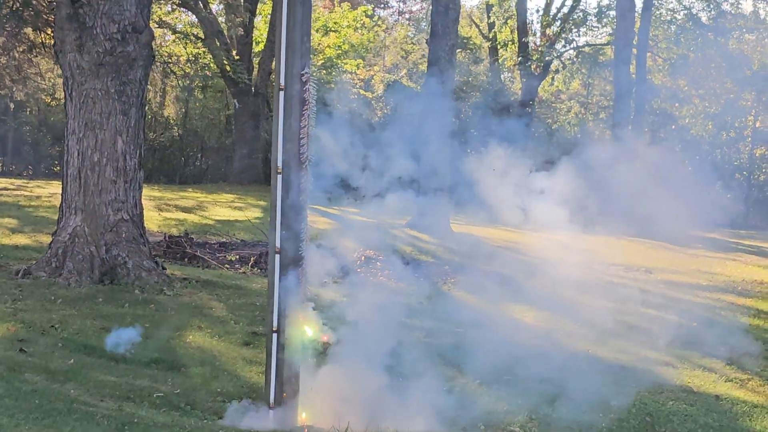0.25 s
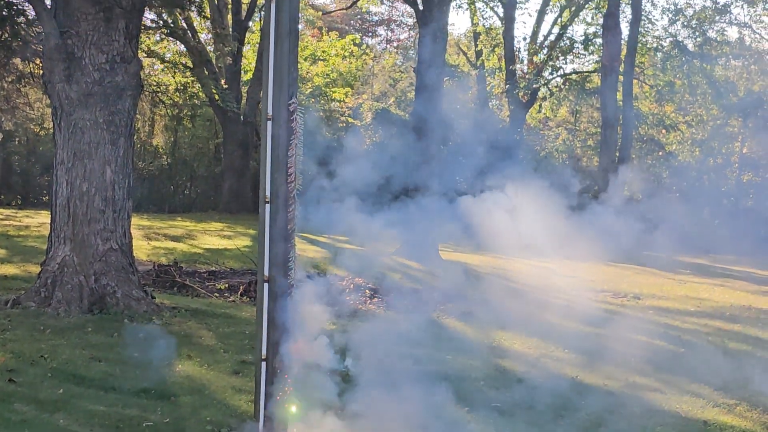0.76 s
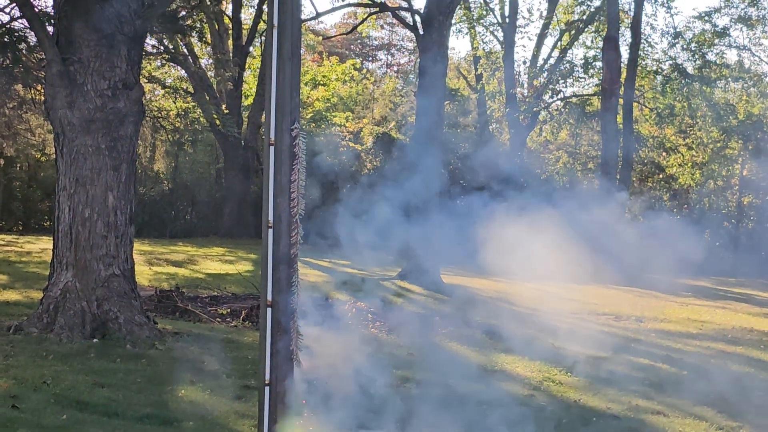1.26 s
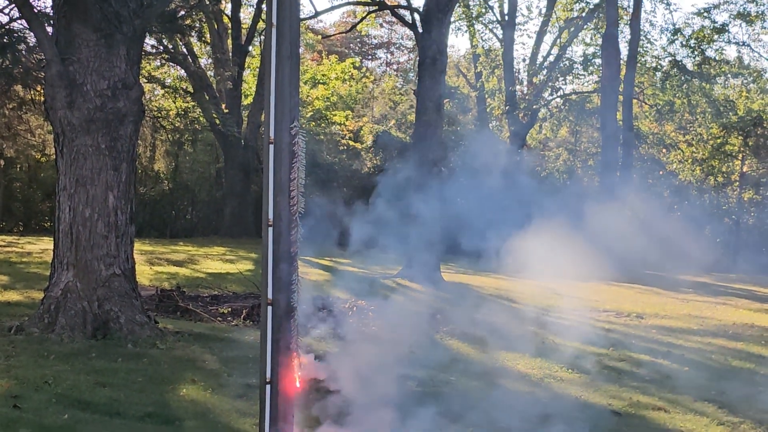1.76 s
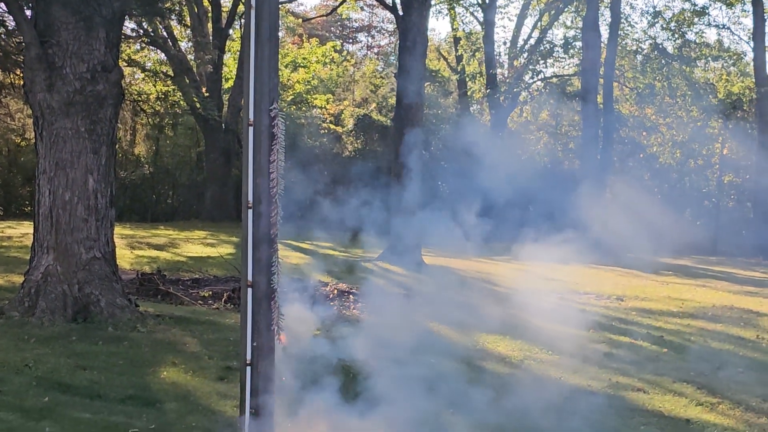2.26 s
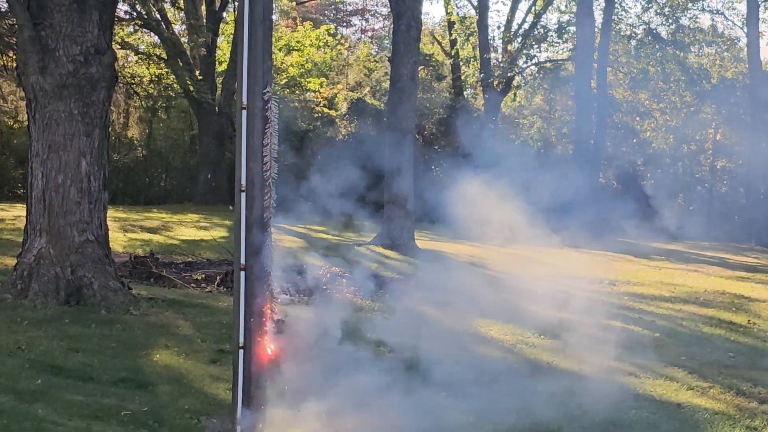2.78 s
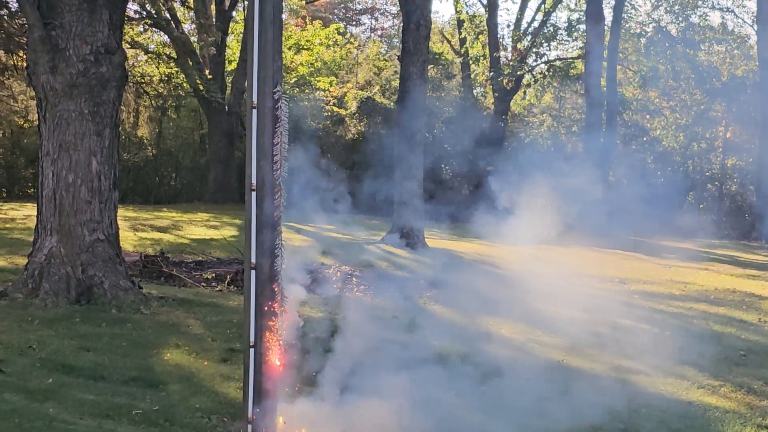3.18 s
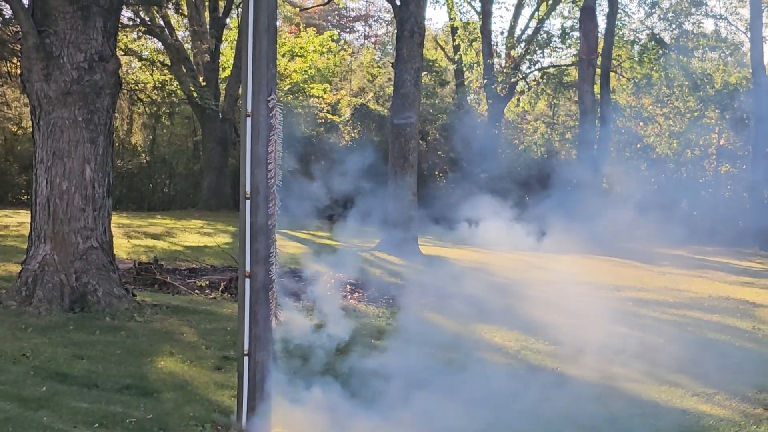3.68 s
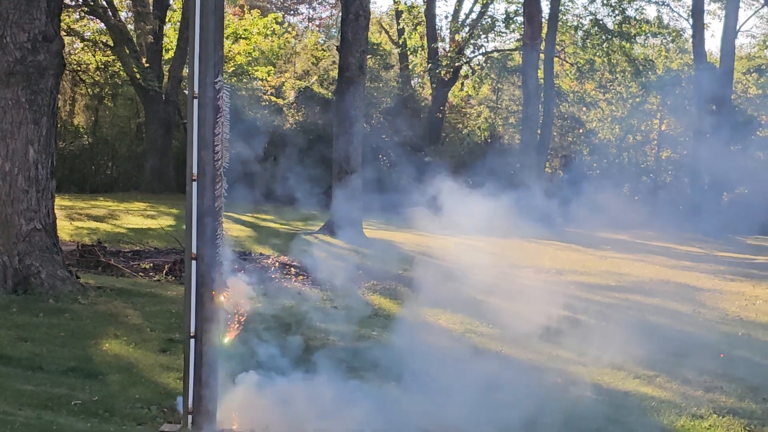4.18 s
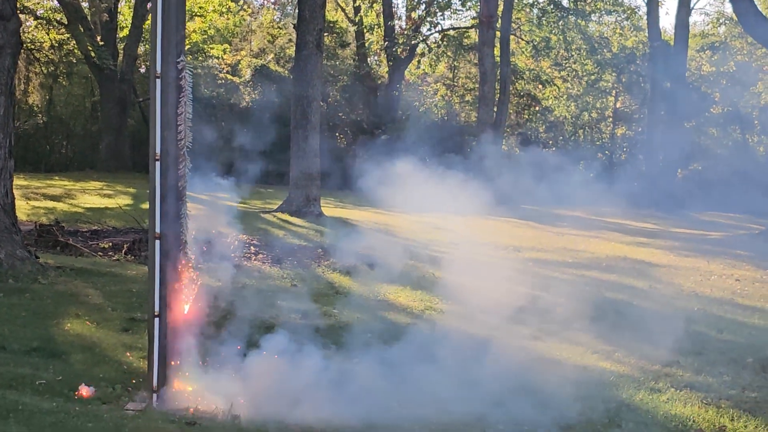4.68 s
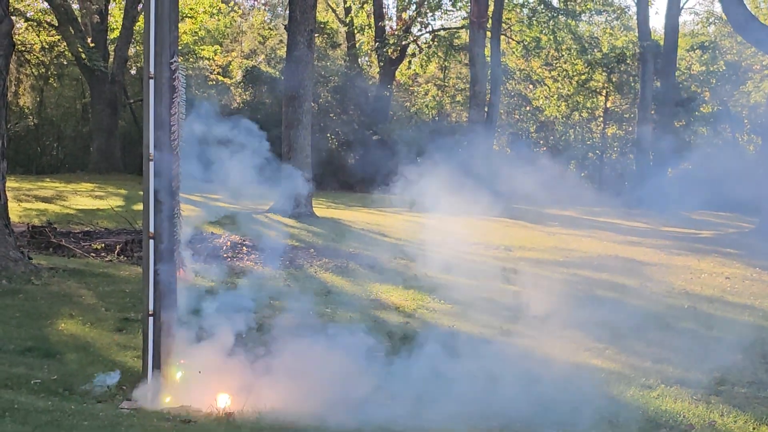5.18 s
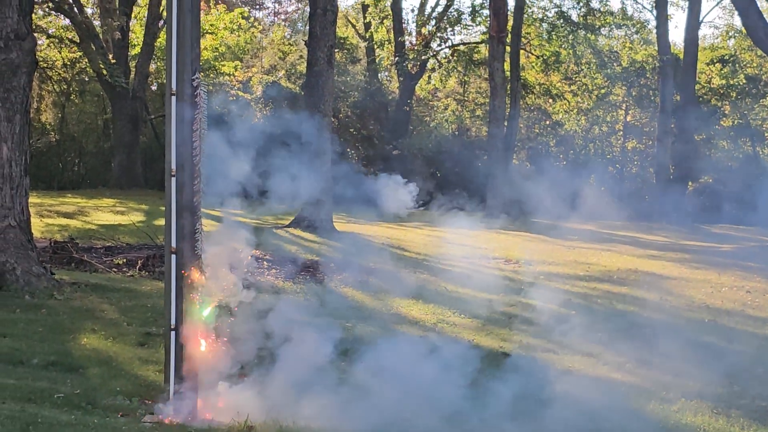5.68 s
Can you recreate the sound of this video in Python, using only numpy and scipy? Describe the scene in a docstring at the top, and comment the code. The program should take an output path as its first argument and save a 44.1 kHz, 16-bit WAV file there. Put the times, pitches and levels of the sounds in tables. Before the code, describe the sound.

A string of firecrackers goes off in sharp, uneven cracks in a tree-lined park, each one thrown back as a bright, splashing echo.

```python
"""A string of firecrackers hanging on a pole goes off in uneven bursts in a park.
Each cracker is a 3 ms crack, a saturated shock front and noise burst, with a knock of damped gas modes.
Trunks and foliage throw it back as a bright wash of decaying noise bands with a few distinct echoes.
Blasts leave a low thump in the microphone, and puffs of air swing it at low pitch.
Leaves rustle faintly as coloured noise and a far engine drones as a wavering sine."""
import sys
import numpy as np
from scipy import signal
from scipy.fft import rfft, irfft
from scipy.io import wavfile

SR = 44100
rng = np.random.default_rng(int(sys.argv[2]) if len(sys.argv) > 2 else 0)


def dump_mix(stems):
    """Bounce the given channels to the path in sys.argv[1] as a 16-bit WAV at rate SR."""
    frames = np.atleast_2d(stems).T  # one column per channel
    limited = np.clip(frames, -1, 1)  # hard clip at full scale
    pcm = np.round(limited * 32767).astype(np.int16)
    wavfile.write(sys.argv[1], SR, pcm)


N = 261954
TIME = np.arange(N) / SR


def from_db(db):
    """Decibel law: 20 dB is a tenfold amplitude."""
    return 10 ** (np.asarray(db) / 20)


def rms_one(x):
    """Power normalisation: scales a sound to rms 1."""
    return x / np.sqrt(np.mean(x ** 2) + 1e-20)


def over_3_ms(x):
    """Energy normalisation: gives a stereo pulse the energy of 3 ms at rms 1."""
    return x / np.sqrt(np.sum(x ** 2) / (2 * .003 * SR))


def at_hz(points, hz):
    """Logarithmic pitch: interpolates a table of (Hz, value) along log frequency."""
    hzs, values = np.transpose(points)
    return np.interp(np.log(np.maximum(hz, 1)), np.log(hzs), values)


def add(out, s, sound):
    """Superposition: mixes a sound in at time s, cut to the length of the scene."""
    at = int(round(s * SR))
    first, last = max(at, 0), min(at + sound.shape[-1], N)
    out[:, first:last] += sound[..., first - at:last - at]


def butter(x, hz, kind, order=2):
    """Maximally flat filtering: a causal Butterworth filter."""
    return signal.sosfilt(signal.butter(order, hz, kind, fs=SR, output="sos"), x)


def peaked(x, hz, peak_db, q):
    """Resonance: lifts one narrow region of a sound by peak_db."""
    b, a = signal.iirpeak(hz, q, fs=SR)
    return x + (from_db(peak_db) - 1) * signal.lfilter(b, a, x)


def coloured(x, spectrum):
    """Minimum-phase filtering by folded cepstrum, so that nothing sounds early."""
    size = 2 * x.shape[-1]
    bin_hz = np.arange(size // 2 + 1) * SR / size
    cepstrum = irfft(np.log(from_db(at_hz(spectrum, bin_hz))))
    cepstrum[1:size // 2] *= 2
    cepstrum[size // 2 + 1:] = 0
    response = np.exp(rfft(cepstrum))
    return irfft(rfft(x, size) * response)[..., :size // 2]


def slow_chance(count, size, hz):
    """Random modulation: rows of wander through hz random knots a second, of spread 1 at the knots."""
    knots = rng.standard_normal((count, size // 50))
    place = np.arange(size) * hz / SR
    return np.array([np.interp(place, np.arange(len(row)), row) for row in knots])


# left-right likeness of diffuse sound: pitch_hz [Hz], correlation [-1 to 1]
LIKENESS = [(60, 0.66), (130, 1), (290, 0.87), (640, 0.6), (1400, 0.11), (3000, 0.077), (15000, 0)]


def stereo_noise(size):
    """Diffuse-field coherence: noise alike in both channels in the bass, unrelated in the treble."""
    alike = np.clip(at_hz(LIKENESS, np.arange(size // 2 + 1) * SR / size), -1, 1)
    mid, side = rfft(rng.standard_normal((2, size)))
    shared = np.sqrt((1 + alike) / 2) * mid
    opposed = np.sqrt((1 - alike) / 2) * side * [[1], [-1]]
    return irfft(shared + opposed, size)


# colour of the breeze in the leaves: pitch_hz [Hz], level_db [relative dB per Hz]
LEAF_COLOUR = [(30, -12), (55, -16), (100, -8), (200, -14.5), (500, -16), (1000, -22.5), (2000, -16),
               (4000, -27.5), (8000, -31), (15000, -47)]
LEAVES_DB = -53.5   # rms
# far engine: time_s [s], level_db [dB rms]
ENGINE = [(0, -87), (3.0, -58), (3.7, -58.5), (4.4, -54.5), (5.94, -66)]


def park(hum_hz=85, waver_hz=1.0):
    """Stationary noise and frequency modulation: leaves rustle faintly and a far engine drones."""
    leaves = from_db(LEAVES_DB) * rms_one(coloured(stereo_noise(N), LEAF_COLOUR))
    waver = rms_one(butter(rng.standard_normal(N), 21, "low"))
    hum = np.sqrt(2) * np.sin(2 * np.pi * np.cumsum(hum_hz + waver_hz * waver) / SR)
    return leaves + hum * from_db(np.interp(TIME, *np.transpose(ENGINE)))


def swing(hz, crest_turns, skew_turns):
    """Damped oscillation: the microphone swings back briefly, its two channels out of step."""
    turns = hz * np.arange(SR // 5) / SR
    u = turns / crest_turns
    phase = turns + skew_turns * np.array([[1], [-1]])
    return -np.sin(2 * np.pi * phase) * u * np.exp(1 - u)


THUMP_HZ, THUMP_RE_PUNCH_DB = 69, -16   # envelope crest, relative to the cracker's punch_db
# puffs of air on the microphone: start_s [s], left_db, right_db [dB of envelope crest], pitch_hz [Hz]
PUFFS = [(.797, -35, -24, 36.07), (1.757, -24, -11.5, 67.9), (2.298, -38, -30, 28), (2.724, -19, -11, 34.3),
         (3.051, -38, -19, 41.55), (3.807, -22, -17, 66), (4.469, -14.5, -27, 84.4), (4.886, -35, -22, 32)]


def thumps():
    """Mechanical recoil: a low swing follows every gas punch, and each puff of air causes its own."""
    out = np.zeros((2, N))
    for s, _, punch_db, *_ in SHOTS:
        recoil = swing(THUMP_HZ, crest_turns=0.3, skew_turns=0.11)
        add(out, s, from_db(punch_db + THUMP_RE_PUNCH_DB) * recoil)
    for s, left_db, right_db, hz in PUFFS:
        add(out, s, from_db([[left_db], [right_db]]) * swing(hz, crest_turns=0.43, skew_turns=.13))
    return out


# colour of the scatter from the trees before tilt: pitch_hz [Hz], level_db [relative dB per Hz]
WASH = [(35, -13.5), (110, -2.5), (175, -7.5), (245, 3.5), (400, -9.5), (520, 0.5), (640, 1), (820, -1),
        (950, -5), (1150, -0.5), (1900, 1), (4500, -2.5), (5600, -6.5), (6600, -7.5), (8200, -6.5),
        (16000, -16.5)]
# its late decay: pitch_hz [Hz], t60_s [s to fall 60 dB]
WASH_T60 = [(60, 1), (250, 1.26), (1500, 0.9), (4000, 0.98), (8000, 0.7), (16000, 0.37)]
# nearby grass and leaves return the treble before the bass: pitch_hz [Hz], crest_s [s to the crest]
CREST = [(100, 0.063), (600, 0.019), (2000, 0.038), (5000, 0.019), (10000, .014)]
# tilt of a usual wash [dB per octave], and the tilt lost for each dB above it
USUAL_WASH_DB, WASH_TILT_DB, DULLING = -20, 0.39, 0.11


def washes(shots, gap_s=0.0015, early_s=0.038, late_db=-8, rise=0.59, same_path=0.45, patchy_db=1.0,
           lump_db=2.5, lump_hz=160, grain_db=4.0, ripple_db=-4):
    """Reverberation by scattering: it swells, falls quickly, then lingers; part repeats with every shot."""
    size = int(.9 * SR)
    t = np.arange(size) / SR
    edges = np.geomspace(25, 17500, 20)
    hz = np.sqrt(edges[1:] * edges[:-1])
    white = [coloured(stereo_noise(3 * size), WASH) for _ in range(2)]
    # neighbouring bands draw on different noise
    bands = np.array([butter(white[k % 2], edges[k:k + 2], "band") for k in range(len(hz))])
    # trunks return separate lumps; the treble, scattered by countless leaves, is smoother
    lumps = lump_db * slow_chance(1, 3 * size, lump_hz)
    lumps = lumps + grain_db * slow_chance(len(hz), 3 * size, lump_hz)
    lumps = lumps / (1 + hz[:, None] / 4000)
    bands = (bands * from_db(lumps)[:, None]).astype(np.float32)

    crest, t60 = at_hz(CREST, hz)[:, None], at_hz(WASH_T60, hz)[:, None]
    after = np.maximum(t - crest, 0)
    swell = np.clip((t - gap_s) / (crest - gap_s), 0, 1) ** rise
    fall = np.hypot(np.exp(-after / early_s), from_db(late_db - 60 * after / t60))
    shape = (swell * fall).astype(np.float32)
    fixed_paths = bands[..., -size:] * shape[:, None]

    out = np.zeros((2, N))
    for s, wash_db in shots:
        tilt = WASH_TILT_DB - DULLING * (wash_db - USUAL_WASH_DB)   # bigger blasts come back duller
        patches = patchy_db * rng.standard_normal(len(hz))
        gain = from_db(wash_db + tilt * np.log2(hz / 2000) + patches).astype(np.float32)
        start = rng.integers(0, 3 * size // 2)
        own = np.einsum("bt,bct->ct", gain[:, None] * shape, bands[..., start:start + size])
        repeated = np.einsum("b,bct->ct", gain, fixed_paths)
        wash = np.sqrt(same_path) * repeated + np.sqrt(1 - same_path) * own
        # every return carries the ragged shape of the burst, which ripples its middle range
        burst = butter(rng.standard_normal((1, 256)), 1300, "low") / np.sqrt(256)
        wash = wash + from_db(ripple_db) * signal.oaconvolve(wash, burst, axes=1)[:, :size]
        add(out, s, wash)
    return out


# distinct echoes from trunks: delay_s [s], level_db [dB re wash_db, before echo gain], centre_hz [Hz]
ECHOES = [(.0255, -5, 1600), (.0325, 5, 1200), (0.0327, -1.5, 1700), (0.066, -1, 480), (0.064, -11.5, 260),
          (.112, -4, 800)]


def echoes(ring_s=0.001613, spread_db=1.0, wander_s=0.001502):
    """Discrete reflection: each trunk returns a short noise slap, its delay shifting with the cracker's place."""
    out = np.zeros((2, N))
    t = np.arange(2048) / SR
    envelope = t / ring_s * np.exp(1 - t / ring_s)
    for delay, echo_db, hz in ECHOES:
        noise = rms_one(butter(coloured(stereo_noise(2 * SR), WASH), [hz / 2, hz * 2], "band"))
        for s, _, _, wash_db, _ in SHOTS:
            start = rng.integers(0, SR)
            slap = noise[:, start:start + len(t)] * envelope
            arrival = s + delay - ring_s + wander_s * rng.normal()
            add(out, arrival, slap * from_db(wash_db + echo_db + spread_db * rng.normal()))
    return out


# modes of the gas punch: pitch_hz [Hz, before detuning], level_db [relative dB, before tilt], decay_s [s]
PUNCH = [(120, -8, 0.0023), (270, 5, 0.0019), (585, 5.5, 0.002), (704, -8, 0.0031)]


def punch(punch_db, uneven_db=5.2, detune_db=0.52, swell_s=0.00062, deepen=0.42, large_db=-12):
    """Modal synthesis: expanding gas gives a short hollow knock, deeper in weight for larger blasts."""
    t = np.arange(1024) / SR
    tilt = deepen * (large_db - punch_db)   # dB per octave
    knock = 0
    for hz, db, decay_s in PUNCH:
        level = from_db(db + tilt * np.log2(hz) + rng.normal(0, uneven_db, (2, 1)))
        mode_hz = hz * from_db(rng.normal(0, detune_db, (2, 1)))   # a frequency ratio, spread about 6 %
        knock = knock - level * np.exp(-t / decay_s) * np.sin(2 * np.pi * mode_hz * t)
    return from_db(punch_db) * over_3_ms(knock * (1 - np.exp(-t / swell_s)))


# filter that colours the crack: pitch_hz [Hz], level_db [dB]
CRACK = [(700, 2.5), (980, 1.5), (1300, 0.5), (1550, 4.5), (1850, 3), (3000, 5), (5200, 0.5), (6500, -6),
         (8200, -0.5), (10000, -4.5), (11400, -1.5), (12500, -5), (16000, -9)]
RING_DB = 8.5   # lift of the tube's ring


def crack(crack_db, edge_db, ring_hz, shock_s=0.00013, burst_s=0.0013, burst_db=-9,
          bounce_s=(0.00157619, 0.00162932), bounce_db=-9, low_hz=700, split_hz=5000, lag_s=.00006,
          ring_q=3.2, drive_db=7):
    """Blast wave and saturation: a shock front, its ground bounce, and the burst of a ringing paper tube."""
    t = np.arange(1024) / SR
    age = t - np.array([[0], [lag_s]])   # the second channel hears it later

    def blast(u):
        """Blast-wave decay: a sudden rise, then a fall through an underpressure."""
        return (u >= 0) * (1 - u / shock_s) * np.exp(-np.abs(u) / shock_s)

    bounce = from_db(bounce_db) * blast(age - rng.uniform(*bounce_s))
    burst = rng.standard_normal((2, len(t))) * np.exp(-t / burst_s) / (1 + (t / .003) ** 8)
    wave = blast(age) + bounce + from_db(burst_db) * burst
    # the capsule saturates, flattening the front into a dense crunch
    wave = np.tanh(from_db(drive_db) * wave)
    wave = butter(coloured(wave, CRACK), low_hz, "high", order=3)
    wave = peaked(wave, ring_hz, RING_DB, ring_q)
    body = over_3_ms(butter(wave, split_hz, "low", order=3))
    edge = over_3_ms(butter(wave, split_hz, "high", order=3))
    return from_db(crack_db) * body + from_db(edge_db) * edge


# every front saturates: its treble follows only this share of the blast's strength
EDGE_DB, EDGE_FOLLOWS = -15, 0.2
# crackers: start_s [s], crack_db, punch_db (gas knock), wash_db (from the trees) [dB, before scene gains],
# ring_hz (paper tube) [Hz]
SHOTS = [(0.0315, -11.5, -20, -24.5, 980), (0.0404, -12, -17, -27.5, 900),
         (0.2552, -16, -23.5, -24.5, 1560), (.7383, -14, -34, -23, 1190), (.7937, -12, -46, -21.5, 2480),
         (.887, -11, -44, -24, 2210), (0.9158, -10.5, -37, -22.5, 3130), (0.971, -9.5, -36, -23, 1320),
         (1.0028, -17, -23, -25, 1110), (1.136, -18, -46, -21, 3220), (1.3574, -11.5, -19, -19.5, 2460),
         (1.3672, -13.5, -24, -20.5, 4420), (1.3937, -21, -40, -24, 2830), (1.7621, -26, -18, -17, 4350),
         (2.0755, -15, -57, -21, 2620), (2.104, -16, -25, -18.5, 1020), (2.266, -11.5, -29, -20.5, 1010),
         (2.2731, -12, -25, -19, 1190), (2.5716, -11.5, -13, -20.5, 2243),
         (2.7181, -15.5, -33, -19.5, 3250), (3.038, -12, -7, -23, 798), (3.0504, -19, -12, -25.5, 1010),
         (3.1207, -13, -39, -23.5, 1930), (3.2943, -11, -19.5, -24, 2790), (3.3536, -8, -29, -22, 2150),
         (3.4222, -8, -24.5, -23, 1200), (3.8064, -12.5, -15.5, -21, 2590), (4.4745, -17.5, -15, -20, 2190),
         (4.5675, -27, -12, -23.5, 798), (4.6835, -14.5, -10.5, -21.5, 1974),
         (4.7256, -13, -12.5, -36.5, 1240), (4.8639, -18.5, -23.5, -20, 4740),
         (4.9622, -12, -18, -20.5, 1050), (5.0008, -19, -26, -25.5, 2570), (5.0489, -15, -21.5, -23, 1040),
         (5.2345, -11.5, -26, -21, 1330), (5.472, -14.5, -38, -19, 1330), (5.73, -15, -9, -17.5, 1028),
         (5.781, -18, -9.5, -22.5, 1970)]


def scene(crack_gain_db=-0.87, punch_gain_db=0.5, wash_gain_db=4.5, echo_gain_db=-2.5,
          earlier_s=-0.085, earlier_db=-22):
    """Superposition of cracks and returns; an earlier cracker's wash is still dying away at first."""
    bangs = np.zeros((2, N))
    for s, crack_db, punch_db, wash_db, ring_hz in SHOTS:
        edge_db = EDGE_DB + EDGE_FOLLOWS * (wash_db - USUAL_WASH_DB)
        add(bangs, s, crack(crack_db + crack_gain_db, edge_db, ring_hz))
        add(bangs, s, punch(punch_db + punch_gain_db))
    returns = [(s, wash_db) for s, _, _, wash_db, _ in SHOTS]
    wash = from_db(wash_gain_db) * washes(returns + [(earlier_s, earlier_db)])
    return bangs + wash + from_db(echo_gain_db) * echoes() + thumps() + park()


CUTOFF_HZ = 16400


def record(dry):
    """Soft limiting and band limiting: shock fronts overload the input; the top is cut."""
    clipped = dry / (1 + (dry / .95) ** 4) ** (1 / 4)
    return signal.sosfilt(signal.ellip(10, .1, 80, CUTOFF_HZ, fs=SR, output="sos"), clipped)


dry = scene()
out = record(dry)
dump_mix(out)
```